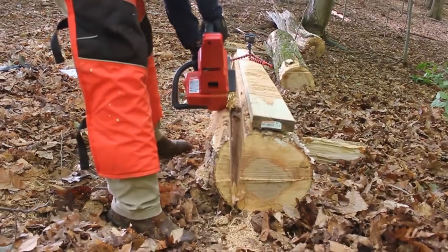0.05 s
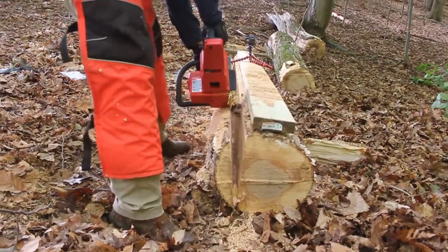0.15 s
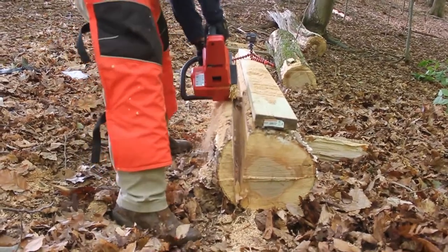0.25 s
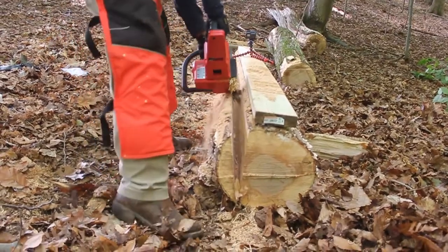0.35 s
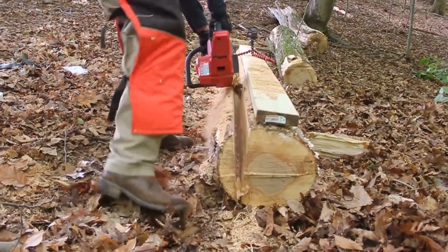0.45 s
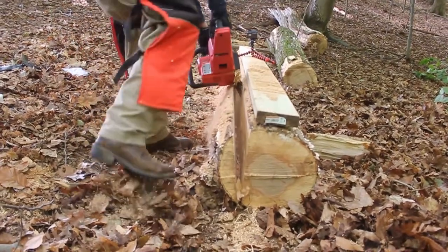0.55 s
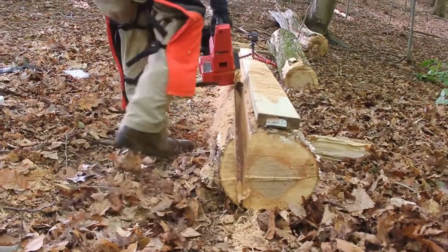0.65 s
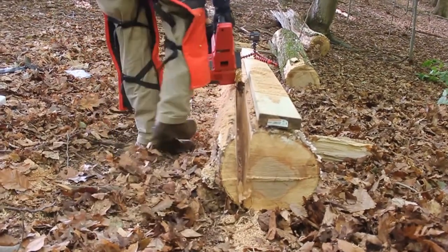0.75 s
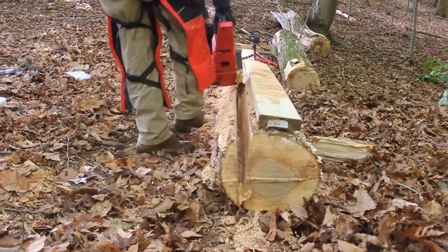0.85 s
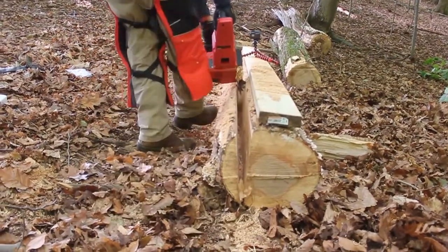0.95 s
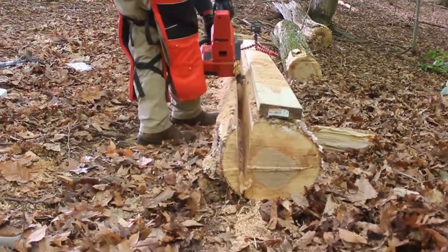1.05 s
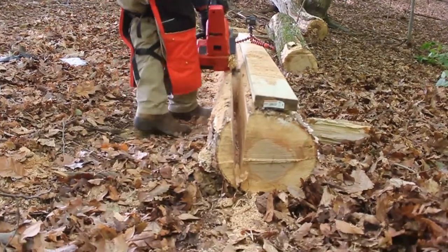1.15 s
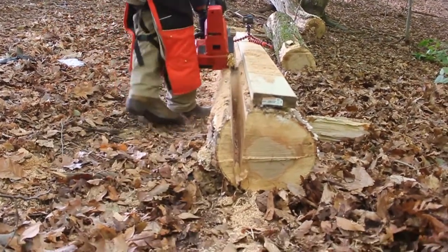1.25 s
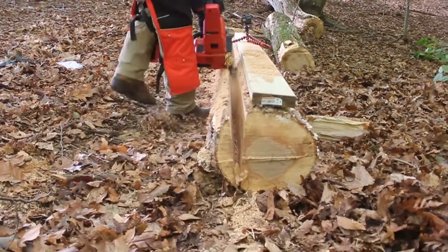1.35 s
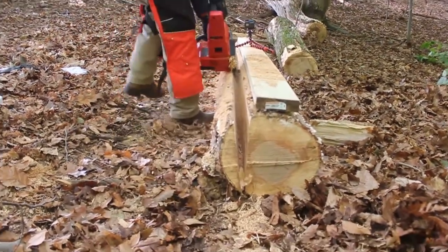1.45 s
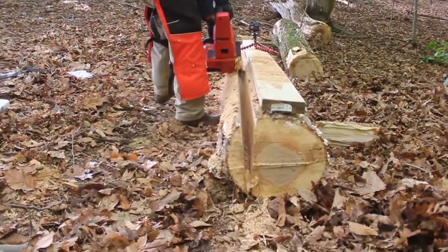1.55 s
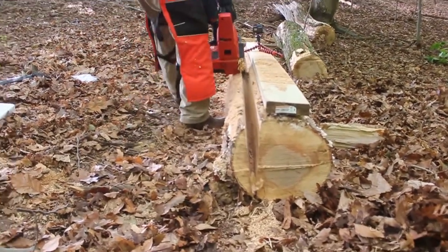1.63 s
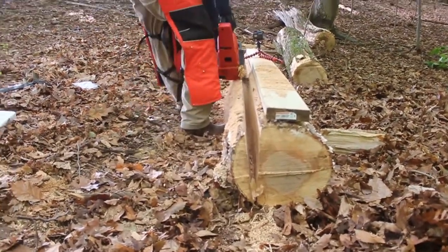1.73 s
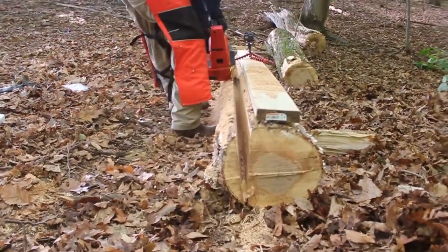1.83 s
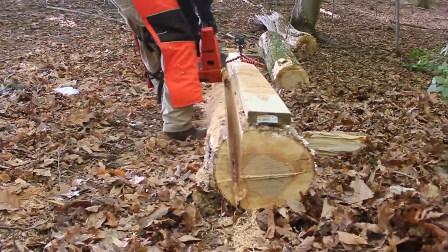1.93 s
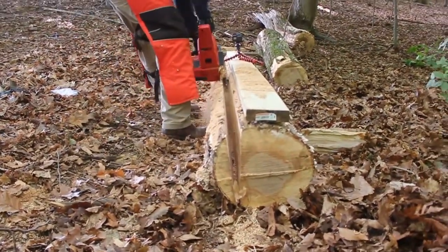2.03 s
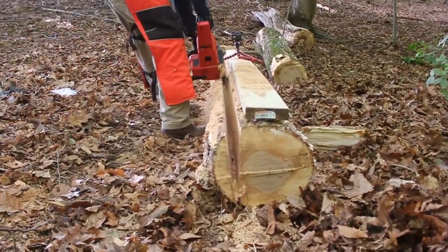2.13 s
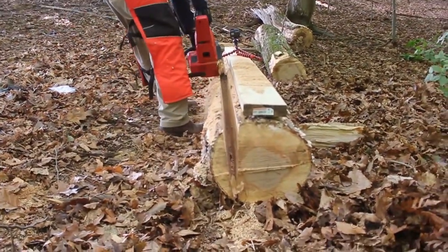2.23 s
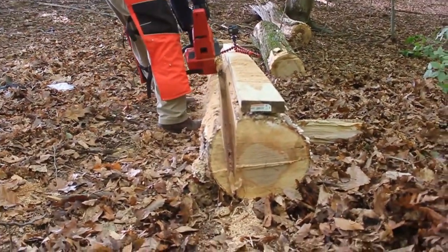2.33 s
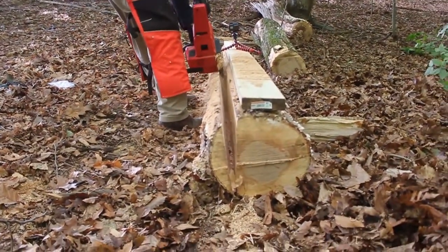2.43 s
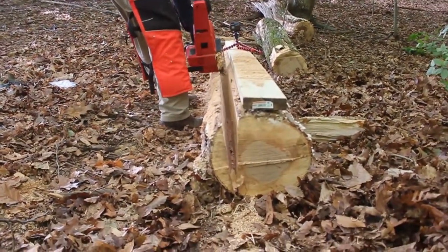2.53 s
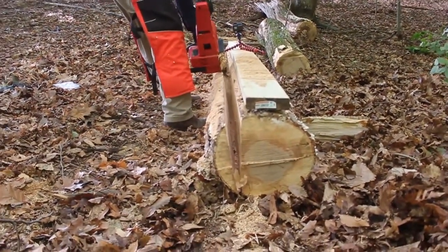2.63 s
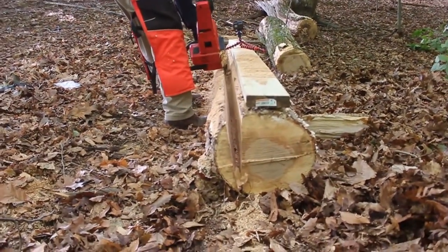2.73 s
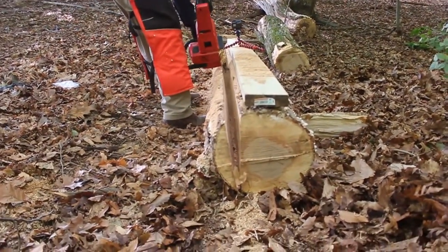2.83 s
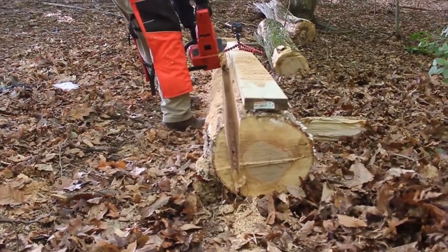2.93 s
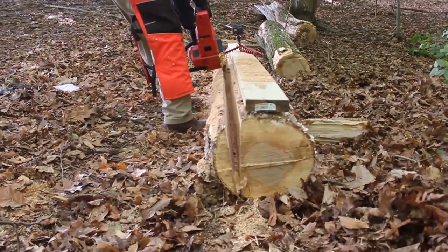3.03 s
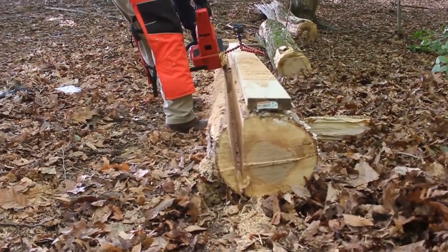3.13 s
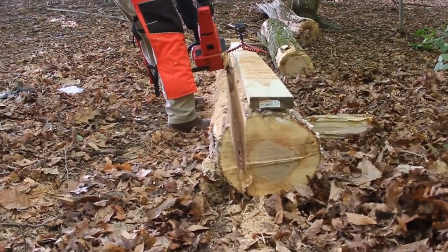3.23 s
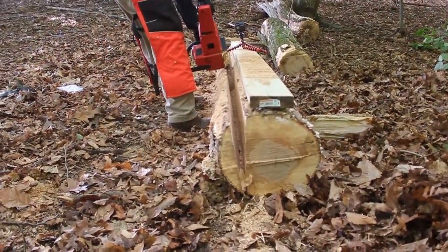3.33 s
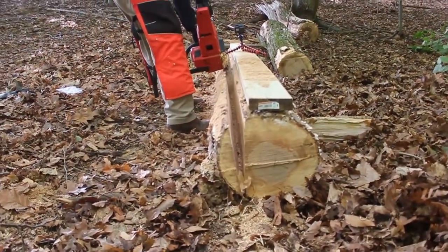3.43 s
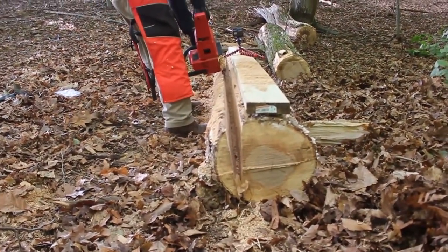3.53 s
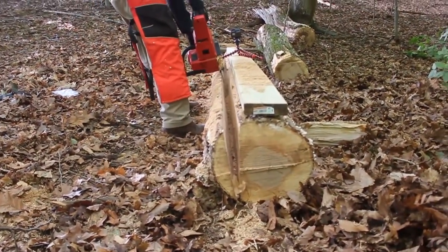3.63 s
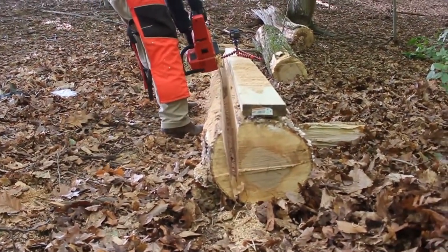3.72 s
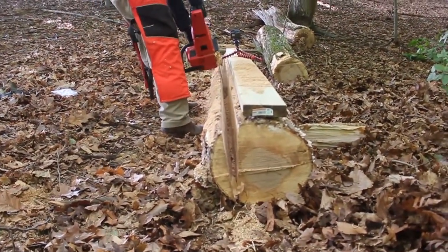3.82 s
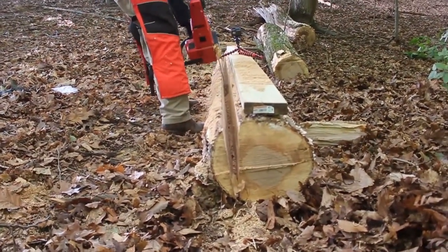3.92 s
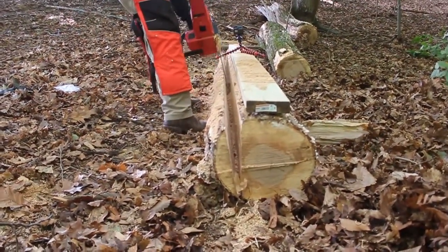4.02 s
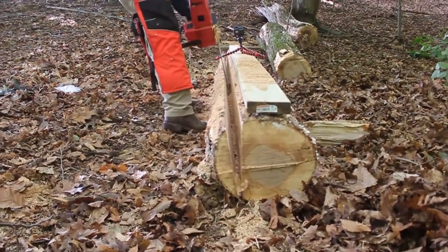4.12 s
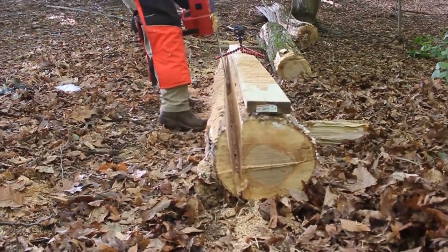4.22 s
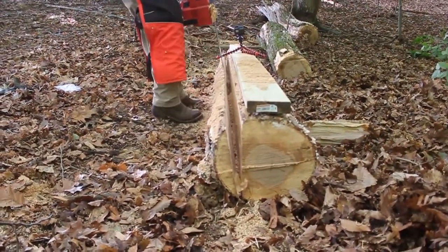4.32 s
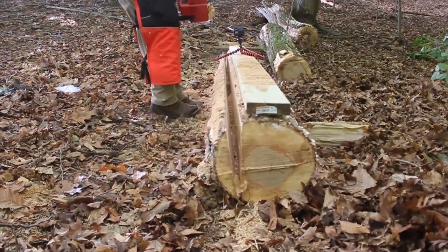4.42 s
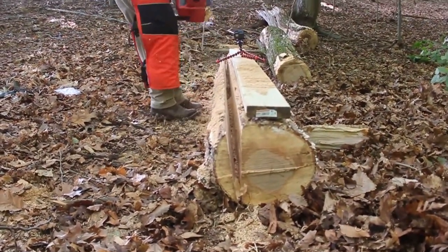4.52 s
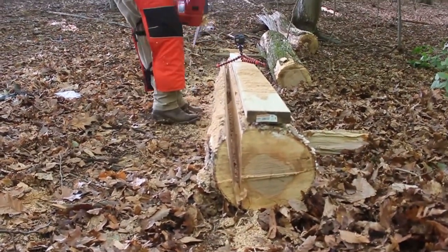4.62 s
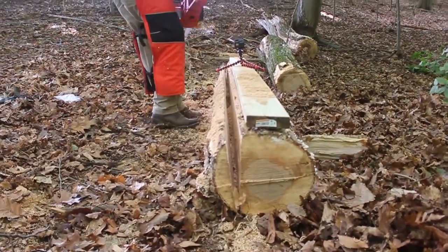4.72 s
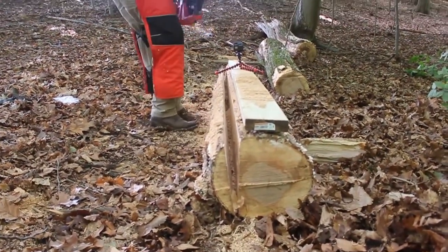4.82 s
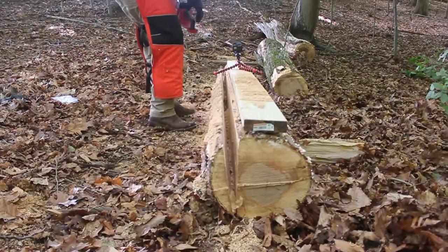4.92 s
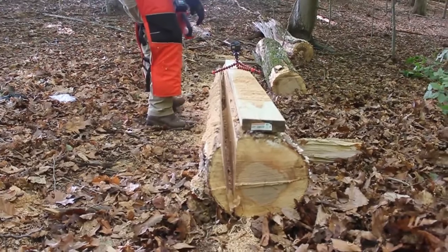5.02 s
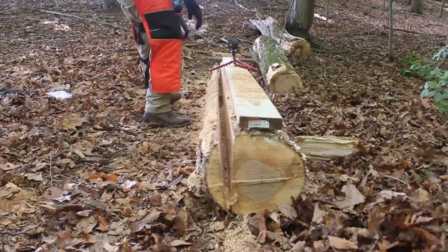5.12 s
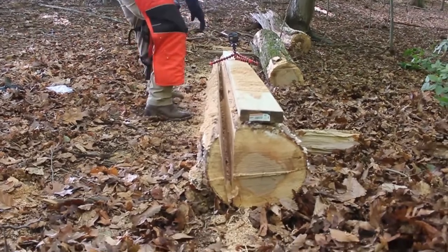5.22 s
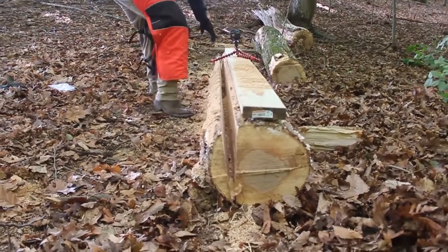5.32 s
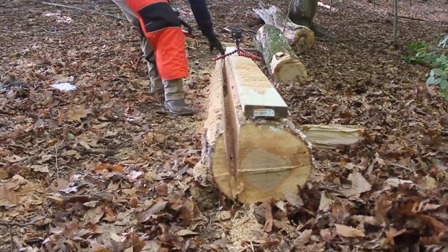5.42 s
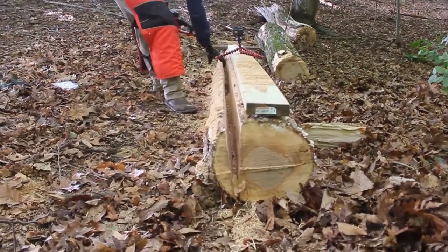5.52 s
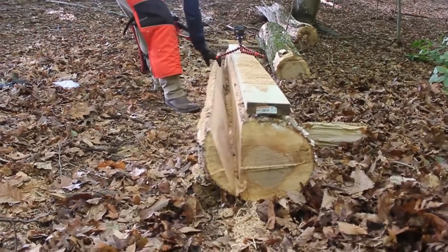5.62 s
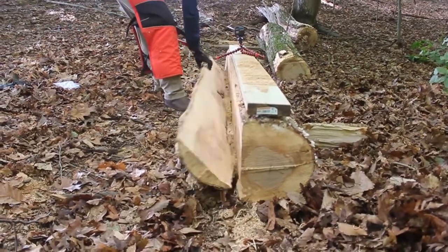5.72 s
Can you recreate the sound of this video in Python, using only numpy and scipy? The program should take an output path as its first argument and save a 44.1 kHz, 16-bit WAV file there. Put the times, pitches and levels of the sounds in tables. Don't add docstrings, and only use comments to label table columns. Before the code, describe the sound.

Close in a quiet wood, an electric chainsaw glides down from full speed and stops. Boots and brittle leaves click, then the chain snaps taut and roars again, whining, sagging under load and recovering. It coasts down to a clunk. Quiet follows with leaf shuffles, twig ticks and a breaking twig, then a sawn slab rips away with hollow knocks. Small camera microphone, dry and central, hiss rising in the quiet.

```python
import sys
import numpy as np
from scipy import signal
from scipy.fft import rfft, irfft, next_fast_len
from scipy.io import wavfile
from scipy.ndimage import uniform_filter1d, map_coordinates

SR = 44100
rng = np.random.default_rng(int(sys.argv[2]) if len(sys.argv) > 2 else 0)


def generate_wav(sig):
    pcm = np.round(np.clip(np.atleast_2d(sig).T, -1, 1) * 32767).astype(np.int16)
    wavfile.write(sys.argv[1], SR, pcm)


def field_ratio(decibels):
    return 10 ** (np.asarray(decibels, dtype=float) / 20)


N = 254016


def unit(x):
    return x / np.sqrt(np.mean(x ** 2) + 1e-20)


def add_db(*levels_db):
    return 10 * np.log10(sum(field_ratio(2 * db) for db in levels_db) + 1e-12)


def along(points, hz):
    f, value = np.transpose(points)
    return np.interp(np.log(hz + 1), np.log(f + 1), value)


def curves(table):
    s, *columns = np.transpose(table)
    return [np.interp(np.arange(N) / SR, s, column) for column in columns]


def within(*tables):
    t = np.arange(N) / SR
    is_open = sum(1. * (t >= rows[0][0]) * (t <= rows[-1][0]) for rows in tables)
    return uniform_filter1d(is_open, size=661)


def wobble(rate):
    at = np.arange(0, N + 32, 32)
    knots = rng.standard_normal(int(N * rate / SR) + 4)
    return np.interp(np.arange(N), at, map_coordinates(knots, [at * rate / SR]))


def filtered(x, response):
    m = next_fast_len(N + SR // 2)
    return irfft(rfft(x, m) * response(np.fft.rfftfreq(m, 1 / SR)), m)[..., :N]


def highpass(corner_hz, order):
    return lambda f: (1j * f / corner_hz / (1 + 1j * f / corner_hz)) ** order


def resonances(modes):
    def response(f):
        return sum((-1) ** k * field_ratio(db) * 1j * f * width / (centre ** 2 - f * f + 1j * f * width)
                   for k, (centre, width, db) in enumerate(modes))
    return response


def coloured(x, spectrum):
    return unit(filtered(x, lambda hz: field_ratio(along(spectrum, hz))))


def grains(rate, spread_db):
    struck = rng.random(N) < rate / SR
    clicks = struck * rng.standard_normal(N) * field_ratio(spread_db * rng.exponential(size=N))
    return unit(clicks / np.sqrt(rate))


def patchy(x, depth_db):
    z = signal.stft(x, nperseg=512)[2]
    field = rng.standard_normal(z.shape)
    field = uniform_filter1d(uniform_filter1d(field, size=7, axis=0), size=18, axis=1)
    return signal.istft(z * field_ratio(depth_db * unit(field)), nperseg=512)[1][:N]


# time in seconds, speed in drive links a second.
POWERED_SPEED = [(0, 574), (1.1, 575.3), (1.6, 574.5), (1.75, 567.4), (1.85, 572.4), (2.22, 564.2),
                 (2.35, 552), (2.405, 538.5), (2.5, 558), (2.535, 549.5), (2.6, 560), (2.66, 556.5),
                 (2.85, 572.1), (2.97, 575.4), (3.05, 570.2), (3.3, 567.5), (3.4, 574.4), (3.7, 562.5)]


def chain_speed():
    t = np.arange(N) / SR
    powered = curves(POWERED_SPEED)[0] + 1.1 * wobble(9)
    drag, coast_s = 590, .73

    def coast(release_s):
        return (powered + drag) * np.exp(-np.maximum(t - release_s, 0) / coast_s) - drag

    start = powered / (1 + np.exp((.94 - t) / .027))
    speed = np.where(t < .768, coast(.155), np.minimum(start, coast(3.705)))
    return np.maximum(speed, 60)


def gliding_share(links_hz):
    return np.clip((552 - links_hz) / 30, 0, 1) * (np.abs(np.gradient(links_hz)) * SR > 400)


def slack_share(links_hz):
    return np.minimum(gliding_share(links_hz) + (links_hz < 100), 1)


# time in seconds, feed pressure in dB, chain tension in dB.
EFFORT = [(0, 0.3, 0.6), (.5, -1.5, -1), (1.05, 1.6, 3), (1.2, 0.4, 4), (1.6, 0.5, 2), (1.9, -0.1, 0.5),
          (2.15, 1.4, 0.5), (2.6, 1, -1.5), (2.9, 0, 1), (3.1, 1.5, -1), (3.6, 0.3, 0.4), (4.1, 2, -13)]
# frequency in Hz, level in dB.
GLIDE = [(170, -80), (290, -42), (410, -44), (490, -52), (570, -44), (700, -42), (900, -37.5), (1060, -45)]
# centre in seconds, peak in dB, half-length in seconds.
BITES = [(1.67, -43, .025), (2.04, -45, .07), (2.2, -32, .075), (2.35, -42, .02), (2.42, -41, .04),
         (2.54, -41, .035), (2.66, -49, .04)]
# time in seconds, level in dB.
CURRENT = [(0, -56), (1, -54), (1.3, -58), (2.1, -55), (2.3, -44), (2.75, -45), (3.05, -50), (3.7, -48)]


def line_levels(links_hz):
    t = np.arange(N) / SR
    tension_db, whine_db = curves(EFFORT)[1], curves(CURRENT)[0]
    slack = slack_share(links_hz)
    driven_db = 10 * (np.gradient(links_hz) > 0)

    def blend(steady_db, gliding_db):
        return steady_db + slack * (gliding_db + driven_db - steady_db)

    link_db = blend(-33.5 + tension_db, along(GLIDE, links_hz))
    sag_db = .25 * np.clip(570 - links_hz, 0, 30)
    double_db = blend(-31 + tension_db - sag_db, along(GLIDE, 2 * links_hz) - 2)
    bites_db = [np.maximum(db - 3 * ((t - s) / half) ** 4, -90) for s, db, half in BITES]
    cutter_db = add_db(-60.5 - 18 * slack + 4 * wobble(11), *bites_db)
    return cutter_db, link_db, double_db, whine_db - 16 * slack


# full-speed level in dB,
# dB lost per halving of speed, extra dB while coasting, start-up surge in dB.
WOOD = (-27.5, 0.5, -1.5, -19.5)
RATTLE = (-28, 3.5, 1, -25.5)
CHIPS = (-37.5, 8, 1.5, -39)
SCRAPE = (-37, 2.5, 1, -30.5)
# a row for its start and one for its end, in seconds.
RUNS = [
    [(0,), (0.564,)],
    [(.868,), (4.116,)],
]


def noise_levels(links_hz):
    t = np.arange(N) / SR
    slack = slack_share(links_hz)
    surge_db = np.clip(6 * np.minimum((t - .9164) / .011, (.97 - t) / .023), -90, 0)
    feed_db = curves(EFFORT)[0] - 10 * np.clip(2 - 2 * links_hz / 152, 0, 1)
    levels_db = []
    for full, halving, coasting, kick in (WOOD, RATTLE, CHIPS, SCRAPE):
        running_db = full + feed_db + halving * np.log2(links_hz / 570) + coasting * slack
        levels_db.append(add_db(running_db, kick + surge_db))
    pinched = slack * (t < RUNS[0][1][0])
    pinch_db = levels_db[3] + 4.5 - 40 * (1 - pinched) - .097 * np.clip(links_hz - 430, 0, 150)
    return levels_db + [pinch_db]


# multiple of the link rate, level in dB.
ORDERS = [(.333, -55), (.667, -52), (1.167, -48), (1.333, -47), (1.5, -42), (2.667, -41), (2.833, -42),
          (3, -45), (3.855, -42), (4, -38.5), (5, -39.5), (5.283, -50), (6, -44), (7, -48), (7.71, -53),
          (8.667, -42), (9, -45), (9.333, -48), (9.645, -47), (11.065, -55), (15.9, -55), (17.35, -50),
          (18.35, -53)]
# centre in Hz, width in Hz, level in dB.
FLARES = [(880, 150, 9), (1520, 140, 7), (2020, 170, 9), (4200, 1400, 7), (5300, 500, 6), (6000, 600, 7)]
GLIDERS = {3: 5, 3.855: 0, 4: 0, 7.71: 11, 11.065: 16}
SAGGING = {8.667: -.4, 9.645: -.2, 5: .12}


def saw_tones(links_hz, phase, rattle_db):
    cutter_db, link_db, double_db, whine_db = line_levels(links_hz)
    gliding = gliding_share(links_hz)
    steady = 1 - gliding
    sag = steady * np.clip(572 - links_hz, 0, 30)

    def tone(order, db):
        return np.sqrt(2) * field_ratio(db) * np.sin(order * phase + rng.uniform(0, 2 * np.pi))

    def flare(hz):
        return gliding * np.clip(20 * np.log10(np.abs(resonances(FLARES)(hz))), -8, 12)

    x = tone(.5, cutter_db + 1.4 * wobble(23.8))
    flutter_db = 5 * steady * np.clip((556 - links_hz) / 10, 0, 1) * (wobble(45) - .6)
    x += tone(1, link_db + 1.2 * wobble(30) + flutter_db)
    x += tone(2, double_db + .7 * np.maximum(flare(2 * links_hz), 0) + .7 * wobble(70))
    x += tone(1.925, double_db - 11 + 1.5 * wobble(20))

    whine_db = np.maximum(whine_db, np.where((gliding > .2) * links_hz > 485, -48.5, -80))
    loaded_db = -40.5 - 1.8 * np.clip(links_hz - 559, 0, 40)
    whine_db = np.maximum(whine_db, np.where((gliding == 0) * (links_hz > 530), loaded_db, -80))
    unsteady_db = np.clip((-44 - whine_db) / 2.5, 0, 4) * (wobble(14) - .8)
    x += tone(22.13, whine_db + 2.5 + 1.2 * wobble(30) + unsteady_db)

    for order, db in ORDERS:
        hz = order * links_hz
        glide_db = -6 * gliding
        if order in GLIDERS:
            dip_db = 10 * (hz < 1350) + 14 * (order == 7.71) * (hz > 2350)
            glide_db = flare(hz) + gliding * (GLIDERS[order] - dip_db)
        load_db = SAGGING.get(order, 0) * sag
        if order == 11.065:
            load_db = load_db + steady * np.clip(whine_db + 50, 0, 7)
        low_cut_db = -30 * np.clip(1 - hz / 330, 0, 1)
        drift_db = 1.4 * wobble(8) + 1.6 * wobble(30)
        x += tone(order, db + 25 + rattle_db + glide_db + load_db + low_cut_db + drift_db)
    return x


# centre in Hz, width in Hz, level in dB.
LOG_MODES = [(245, 41, -7), (626, 235, -5.5), (877, 93, 1.5), (1139, 102, 1), (1548, 105, -4.5)]
# centre in Hz, width in Hz, level in dB.
BAR_MODES = [(1930, 690, -6), (2260, 163, -1.5), (2693, 248, -0.5), (3500, 254, -2), (4130, 930, -8.5),
             (5124, 210, 2.5), (5360, 730, -2.5), (6430, 390, -13)]
# centre in Hz, width in Hz, level in dB.
RAIL_MODES = [(1980, 130, -14.5), (2672, 62, -1.5), (5080, 220, -6.5), (5460, 187, 2), (11100, 480, -21)]
# centre in Hz, width in Hz, level in dB.
PINCHED_MODES = [(5100, 290, -6.5), (5540, 290, -1)]
# frequency in Hz, level in dB per Hz.
CHIP_AIR = [(3820, -33), (6500, 3), (6750, -5.5), (7490, -6), (12400, -5), (13500, -7), (15100, -8.5),
            (15800, -26)]


def saw_noise(links_hz, phase, levels_db):
    wood_db, rattle_db, air_db, rail_db, pinch_db = levels_db
    beat = (1 + .22 * np.cos(phase)) * (1 + .023 * np.cos(phase / 3)) * field_ratio(.19 * wobble(60))
    blows = beat * grains(12 * links_hz + 2400, spread_db=2.0)
    chips = beat * grains(22 * links_hz + 4500, spread_db=-2.5)
    low_cut = highpass(230, 5)
    log = filtered(blows, lambda f: resonances(LOG_MODES)(f) * low_cut(f))
    bar = filtered(blows + 1.28 * chips, lambda f: resonances(BAR_MODES)(f) / (1 + (f / 6600) ** 8))
    noise = field_ratio(wood_db - 3.5) * unit(log) + field_ratio(rattle_db + .13) * unit(bar)
    noise += field_ratio(rail_db + 1) * unit(filtered(blows, resonances(RAIL_MODES)))
    squeal_db = pinch_db + 1.5 * wobble(14) + 1.7 * wobble(58.4)
    noise += field_ratio(squeal_db) * unit(filtered(blows, resonances(PINCHED_MODES)))
    sag = (1 - gliding_share(links_hz)) * np.clip(572 - links_hz, 0, 30)
    hiss_db = air_db - .09 * sag + .53 * wobble(4.07) + .52 * wobble(31.95)
    noise += field_ratio(hiss_db) * coloured(chips + .51 * blows, CHIP_AIR)
    return patchy(noise, 1.3)


def saw():
    links_hz = chain_speed()
    phase = 2 * np.pi * np.cumsum(links_hz) / SR
    levels_db = noise_levels(links_hz)
    tones = saw_tones(links_hz, phase, rattle_db=levels_db[1])
    return (tones + saw_noise(links_hz, phase, levels_db)) * within(*RUNS)


# time in seconds, level in dB.
STOPS = [
    (0.871, -42),
    (.878, -33),
    (.892, -21),
    (2.625, -22),
    (2.66, -21),
    (4.011, -24),
    (4.0626, -21),
    (4.1288, -24.5),
]
# time in seconds, level in dB.
BOG = [(2.28, -51), (2.35, -37.5), (2.46, -39.5), (2.6, -64)]


def jolts():
    blows, t = np.zeros(N + SR), np.arange(600) / SR
    for s, db in STOPS:
        blows[round(s * SR):][:len(t)] += field_ratio(db + 12.5 - 60 * t / .025) * rng.standard_normal(len(t))
    slams = filtered(blows[:N], lambda f: resonances(LOG_MODES[1:] + BAR_MODES)(f) / (1 + 1j * f / 2500))
    shaking = field_ratio(1.8 * wobble(40)) * rng.standard_normal(N)
    judder = unit(filtered(shaking, lambda f: resonances([(410, 330, 0)])(f) ** 2))
    return slams + field_ratio(curves(BOG)[0]) * within(BOG) * judder


# frequency in Hz, level in dB, t60 in seconds (any t60 above 0.04 s is
# played as 0.04 s).
HALT_RING = [(740, -8.5, 0.48), (1593, -12, 0.021), (1950, -2, 0.025), (2600, 2, 0.022), (3117, -24, 0.056),
             (3666, -24, 0.041), (5093, -24, 0.031), (7854, -22, 0.017)]


def halt():
    x, t = np.zeros(N), np.arange(SR // 10) / SR
    ring = sum(field_ratio(db - 60 * t / min(t60, .04)) * np.sin(2 * np.pi * hz * t) for hz, db, t60 in HALT_RING)
    x[round(4.1288 * SR):][:len(t)] = field_ratio(-25) * ring
    return filtered(x, highpass(500, 2))


def chirp():
    t = np.arange(N) / SR
    swell = np.interp(t, [.855, .875, .885, .92, .94], [0, .5, 1.2, .5, 0])
    hz = 8000 + 4000 * np.clip(t - .86, 0, .1)
    return field_ratio(-52) * swell * np.sin(2 * np.pi * np.cumsum(hz) / SR)


# time in seconds, level in dB.
TEARING = [(5.626, -47), (5.632, -35), (5.658, -31), (5.666, -46), (5.7, -45), (5.76, -40)]
# centre in Hz, width in Hz, level in dB.
FIBRES = [(1500, 700, 2), (2410, 900, 2), (3500, 1200, -6), (5400, 810, -11)]


def tearing():
    splinters = field_ratio(2.9 * wobble(150)) * grains(3000, spread_db=2.5)
    started = np.arange(N) / SR > TEARING[0][0]
    return field_ratio(curves(TEARING)[0]) * started * unit(filtered(splinters, resonances(FIBRES)))


# ratio to its pitch, level in dB.
KNOCK_MODES = [(.75, -50), (1, 9.5), (1.45, 0)]


def snaps(events, crack_t60, knock_turns, width):
    x, t = np.zeros(N + SR), np.arange(SR // 6) / SR
    for s, db, crack_hz, knock_db, knock_hz in events:
        burst = rng.standard_normal(len(t)) * field_ratio(-60 * t / crack_t60)
        burst[0] = 2.2
        band = signal.butter(2, [crack_hz / width, min(crack_hz * width, 15000)], "bandpass", fs=SR)
        crack = signal.lfilter(*band, burst) + .12 * burst
        knock = 0
        for ratio, level in KNOCK_MODES:
            hz = knock_hz * ratio
            knock = knock + field_ratio(level - 60 * t * hz / knock_turns) * np.sin(2 * np.pi * hz * t)
        snap = field_ratio(db) * crack / np.abs(crack).max() + field_ratio(db + knock_db - 7) * knock
        x[round(s * SR):][:len(t)] += snap
    low_cut = highpass(190, 2)
    return filtered(x[:N], lambda f: low_cut(f) / (1 + 1j * f / 6000))


# time in seconds, peak in dB, crack in Hz, knock in dB, knock in Hz.
SLAB = [(5.5185, -29, 1400, 1.5, 970), (5.5225, -27, 1800, -6, 800), (5.527, -30, 2000, -6, 900),
        (5.532, -35, 1500, -4, 700), (5.6175, -26, 2200, -18, 1300), (5.6235, -34, 1600, -7, 900),
        (5.6298, -25.5, 2500, 6.5, 704), (5.633, -23.5, 2500, 9.5, 815), (5.6397, -23, 2800, 8.5, 970),
        (5.643, -25, 1800, 4, 900), (5.6464, -28, 4500, -12, 1200), (5.6517, -26, 4000, -7, 870),
        (5.6543, -25, 4000, -4, 900), (5.6566, -16.5, 2600, 3, 1030), (5.6591, -23.5, 1900, 11, 760),
        (5.6642, -28, 2500, 0, 900), (5.6755, -35, 3000, -2, 900), (5.6988, -33, 2500, -7, 950),
        (5.7048, -29, 3000, -0.5, 556), (5.7148, -28, 1600, 1, 1200), (5.7185, -35, 1500, 9, 870),
        (5.7235, -35, 2500, -7, 870), (5.731, -31, 3000, -8, 900), (5.7358, -24.5, 3300, -9, 840),
        (5.7465, -38, 3000, 9, 556), (5.7503, -23, 2500, -9, 895), (5.7515, -27, 4000, -12, 600),
        (5.7572, -12, 3500, -9.5, 880)]
HOLLOW = [
    (5.521, -40, 1800, 9, 277),
    (5.63, -40, 1800, 10, 370),
    (5.652, -40, 1800, 8, 290),
]
TICKS = [(0.6291, -27, 3300, -19, 999), (0.641, -28, 5460, -21, 314), (0.8034, -40, 1200, -8, 320),
         (0.8175, -34.5, 2850, -14, 842), (0.827, -34, 5000, -13, 867), (4.1514, -40, 5130, -11, 751),
         (4.1779, -35, 1200, -12, 886), (4.3294, -37, 1220, -19, 930), (4.355, -33, 1530, -16, 725),
         (4.4118, -25, 3000, -20, 334), (4.4478, -31.5, 2580, -18, 490), (4.7771, -41, 1370, 3, 750),
         (4.4994, -43, 1200, -6, 476), (4.5965, -40, 5060, -21, 664), (4.69, -48, 2000, 2, 690),
         (4.7657, -45.5, 3700, 5, 684), (4.818, -36.5, 3030, -9, 705), (4.8635, -36, 3930, -14, 865),
         (4.9207, -36, 2700, -11, 320), (5.029, -32.5, 5000, -5, 840)]
TWIG = [
    (5.4083, -15, 2500, -26, 1100),
]
CLICKS = [(.6275, -33, 9000, -30, 900), (.64, -28, 9000, -30, 900), (.6425, -29, 7000, -30, 900),
          (.645, -25, 7000, -30, 900), (.6558, -31, 8000, -30, 900), (.6605, -31, 9500, -30, 900),
          (.67, -39, 7000, -30, 900), (.687, -41, 6000, -30, 900), (.7068, -33, 3500, -20, 1100),
          (.7369, -39, 3500, -24, 900), (4.4104, -23, 3000, -25, 900), (4.4578, -30, 3500, -20, 900),
          (4.4655, -36, 4500, -20, 900), (4.4862, -36, 4800, -20, 900), (4.526, -39, 2500, -20, 900),
          (5.121, -29, 4000, -20, 900), (5.2375, -38, 5500, -20, 900), (5.247, -26, 4000, -9, 877),
          (5.3235, -30, 6500, -20, 900), (5.357, -30, 4000, -12, 900)]


def wood_and_twigs():
    x = snaps(SLAB, crack_t60=.012, knock_turns=11, width=1.8)
    x += snaps(HOLLOW, crack_t60=.01, knock_turns=38, width=2)
    x += snaps(TICKS, crack_t60=.021, knock_turns=23, width=1.35)
    x += snaps(TWIG, crack_t60=.005, knock_turns=8, width=1.7)
    x += snaps(CLICKS, crack_t60=.007, knock_turns=10, width=1.8)
    return x


# peak in seconds, length in seconds, low shuffle in dB, crisp leaves in dB.
SCUFFS = [(0.54, 0.044, -38, -45), (0.65, 0.17, -82, -46.5), (0.84, 0.046, -51, -51.5),
          (4.134, 0.094, -46, -73), (4.305, 0.14, -49, -52.5), (4.446, 0.075, -46.5, -44),
          (4.501, 0.033, -44, -58), (4.76, 0.035, -57, -55), (4.916, 0.22, -50.5, -51.5),
          (5.06, 0.067, -47, -45), (5.113, 0.067, -43.5, -39.5), (5.308, 0.23, -42, -41),
          (5.434, 0.13, -42.5, -58), (5.618, 0.099, -46, -54), (5.67, 0.037, -46, -45),
          (5.752, 0.12, -38, -44)]


def scuffs():
    t = np.arange(N) / SR
    low_db, crisp_db = [-57.5 + 0 * t], [-63 + 0 * t]
    for s, length, low, crisp in SCUFFS:
        fall_db = np.minimum(13 * (t - s), 11.5 * (s - t)) / length
        low_db.append(np.maximum(low + fall_db, -99))
        crisp_db.append(np.maximum(crisp + fall_db, -99))
    return add_db(*low_db), add_db(*crisp_db)


# frequency in Hz, level in dB per Hz.
SHUFFLE = [(71, -51), (120, -5), (479, -1), (610, -1.5), (905, 1), (1380, -8.5), (2500, -12), (3250, -10.5),
           (5500, -120)]
# frequency in Hz, level in dB per Hz.
CRISP = [(880, -25), (1500, -7.5), (2740, -7), (2960, -3), (3530, -3), (5140, -2), (7470, -12),
         (11300, -11), (15800, -17)]


def leaves():
    shuffle_db, crisp_db = scuffs()
    crackle = field_ratio(.29 * wobble(28) + .93 * wobble(90)) * grains(6000, spread_db=1.5)
    drag = field_ratio(1.7 * wobble(40)) * grains(2500, spread_db=-3.0)
    return field_ratio(crisp_db - 1.9) * coloured(crackle, CRISP) + field_ratio(shuffle_db - 2) * coloured(drag, SHUFFLE)


# frequency in Hz, t60 in seconds.
TREES = [(300, 0.2), (2000, 1), (10000, 0.04)]


def trees(x):
    hz, _, z = signal.stft(rng.standard_normal(SR // 3), SR, nperseg=256)
    t = _
    tail = signal.istft(z * field_ratio(-60 * t / along(TREES, hz)[:, None]), SR, nperseg=256)[1]
    return signal.fftconvolve(np.pad(x, (300, 0)), tail / np.linalg.norm(tail))[:N]


# time in seconds, gain in dB.
GAIN = [
    (0, -1),
    (4.25, -4.5),
    (4.55, 3),
    (5.1, 8.5),
    (5.63, 8.5),
    (5.68, 3),
    (5.76, 5),
]
# time in seconds, level in dB.
GUST = [(0, -60), (1, -56.5), (2.2, -62), (3.7, -56), (4.5, -51), (5.25, -40.5), (5.76, -42)]
# frequency in Hz, level in dB per Hz.
RUMBLE = [(3, -10), (8, 0), (15, -2), (24, -14), (40, -26), (65, -60)]
# frequency in Hz, level in dB per Hz.
THUD = [(40, -34), (60, -2), (100, 0.5), (150, -10.5), (250, -23)]


def wind_and_ground():
    gain_db = curves(GAIN)[0]
    air_db = curves(GUST)[0] + 2.5 * wobble(2.86)
    shared, left, right = (coloured(rng.standard_normal(N), RUMBLE) for _ in range(3))
    air = field_ratio(air_db) * (.85 * shared + .5 * np.array([left, right]))
    rest_db = -67.5 + 1.26 * gain_db + 2.4 * wobble(2.92)
    ground_db = add_db(rest_db, scuffs()[0] - 27) + 1.5 * wobble(9)
    ground = coloured(rng.standard_normal((3, N)), THUD)
    spread = .45 * field_ratio(1.2 * (gain_db - 7))
    return air + field_ratio(ground_db) * (ground[0] + spread * ground[1:])


def scene():
    near = wood_and_twigs()
    ahead = saw() + jolts() + halt() + chirp() + tearing() + near + leaves() + field_ratio(-17) * trees(near)
    return ahead + wind_and_ground()


def band_limit(x):
    return signal.sosfilt(signal.butter(12, 16520, fs=SR, output="sos"), x)


def record(dry):
    hiss_colour = [(100, 2), (1000, 2), (15000, -1.5)]  # Hz, dB
    hiss = filtered(rng.standard_normal((2, N)), lambda f: field_ratio(along(hiss_colour, f)))
    x = dry + field_ratio(curves(GAIN)[0] - 69) * hiss
    x = x / (1 + np.abs(x / .42) ** 4) ** .25
    mix = filtered(x, lambda hz: hz < 15830)
    return band_limit(mix)


dry = scene()
out = record(dry)
generate_wav(out)
```